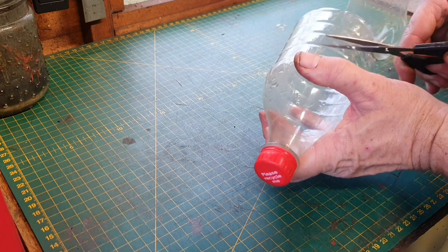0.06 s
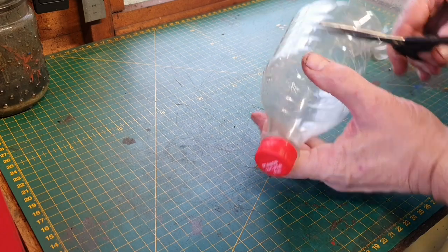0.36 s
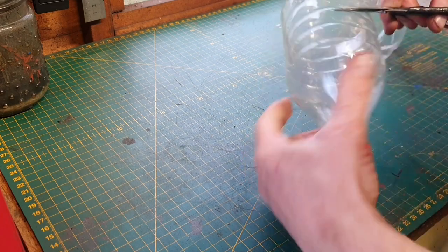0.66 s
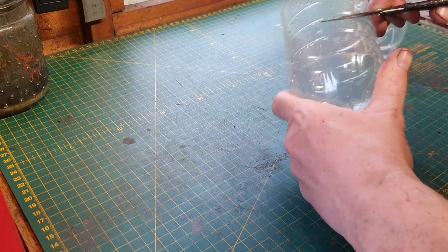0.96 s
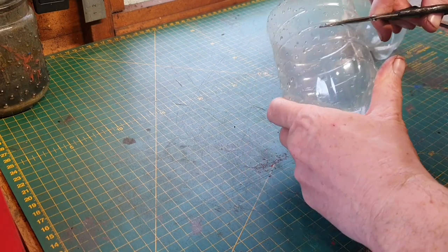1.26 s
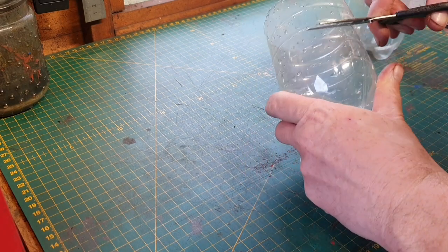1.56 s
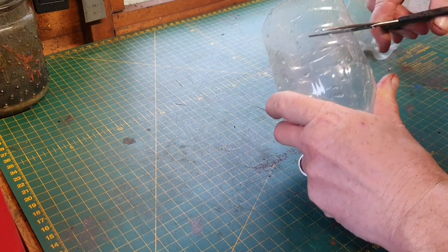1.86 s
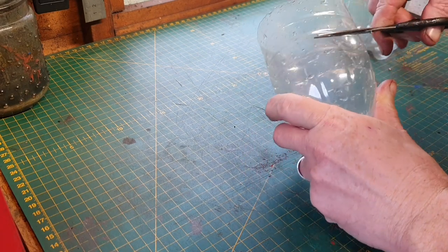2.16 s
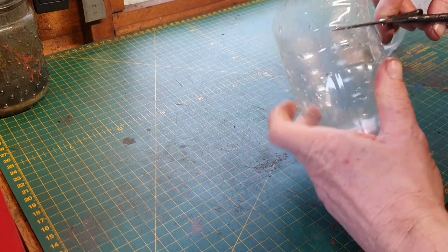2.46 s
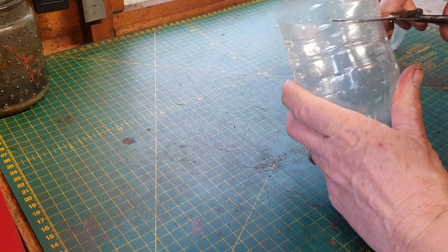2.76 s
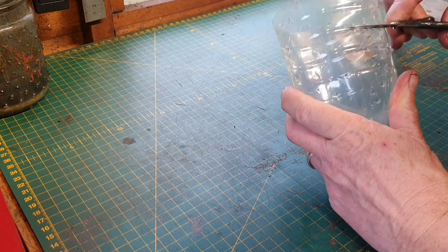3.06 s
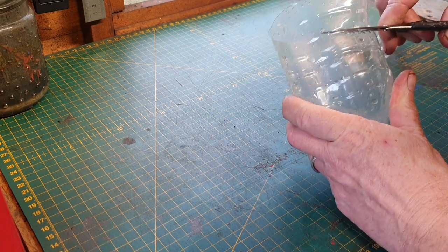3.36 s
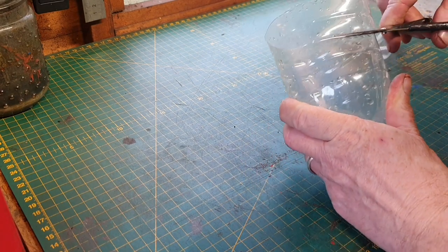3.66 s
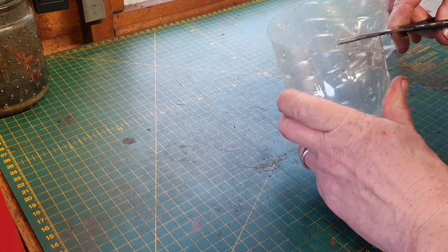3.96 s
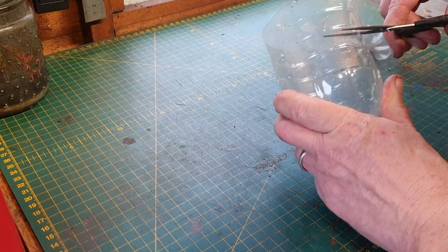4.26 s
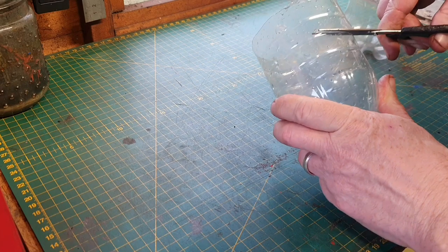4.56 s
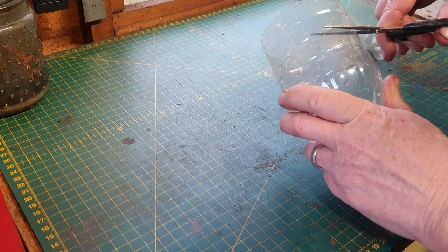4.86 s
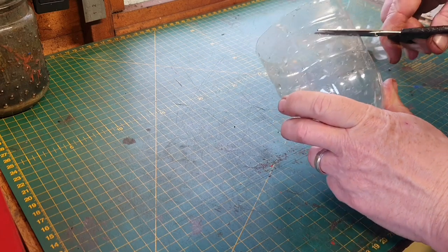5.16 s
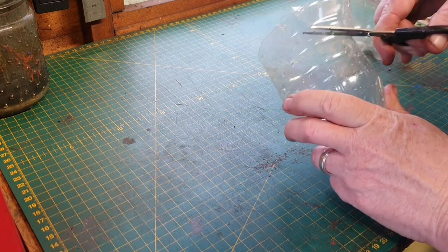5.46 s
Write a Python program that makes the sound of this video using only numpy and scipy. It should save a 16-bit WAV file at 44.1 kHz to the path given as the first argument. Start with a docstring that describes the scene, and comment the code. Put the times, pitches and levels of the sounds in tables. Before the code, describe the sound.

Scissors cut through a thin plastic bottle, heard close and slightly to the right in a small, dry room with a faint low rumble and hiss. Short, scratchy rasps and tiny crinkles come unevenly throughout, mixed with sharp snaps that carry a brief hollow note from the air inside. A cluster of snaps opens at about 0.2 seconds, followed by soft pops as fingers dent the wall. The blades give one thin, bright click near 1 second. Firmer rasps and hollow snaps run from 1.2 to 2.3 seconds, with a sharper crack at 2.5. A quieter stretch of soft pops and rubbing follows. The loudest cracks come in two quick pairs, at about 3.9 and 4.1 seconds. From 4.4 seconds the bottle bumps dully against the palm a few times, and a dense run of snaps from 5 to 5.3 seconds leads to a last short rasp.

```python
"""Scissors cutting a plastic bottle

Scissors work through a thin bottle held over a workbench in a small, dry room with a faint rumble.
The blades rasp along the cut and click once. The wall snaps and buckles, and the air inside gives
a hollow note. The holding hand dents the wall with soft pops and sometimes bumps the whole bottle."""
import sys
import numpy as np
from scipy import signal
from scipy.fft import rfft, irfft, next_fast_len
from scipy.io import wavfile

SR = 44100
rng = np.random.default_rng(int(sys.argv[2]) if len(sys.argv) > 2 else 0)


def pcm_store(signal):
    """Save signal as 16-bit PCM."""
    levels = np.round(np.clip(np.atleast_2d(signal), -1, 1) * 32767)
    wavfile.write(sys.argv[1], SR, levels.astype(np.int16).T)


N = 243428

# Tone of the room's rumble and hiss: pitch_hz, relative_db
RUMBLE_TONE = [(20, -17), (50, -5.5), (80, 3.5), (110, -8.5), (150, -20), (250, -22), (400, -26.5),
               (650, -28), (1000, -35), (4000, -47.5), (14000, -54)]
# How long the room takes to fade by 60 dB: pitch_hz, fade_s
ROOM_FADE = [(150, 0.11), (400, 0.15), (1000, 0.12), (3000, 0.12), (8000, 0.1), (15000, 0.12)]
# How alike the echo is on the left and right (1 = the same): pitch_hz, likeness
ROOM_LIKENESS = [(250, .97), (650, .8), (1500, .45), (4000, .1)]
# Strokes of blades and fingers: peak_s, length_s, relative_db, air_vs_rasp_db, tilt_db_per_octave
STROKES = [(0.035, .15, -39.5, 2, -1), (0.117, .07, -45.5, -5, -1), (0.198, .04, -37, 5.5, 3.5),
           (0.378, .08, -52.5, -1, -1), (0.46, .1, -46.5, -14.5, -3), (0.597, .17, -62, -9, 3.5),
           (0.674, .06, -55.5, 7, 2), (0.747, .15, -65.5, -9, 4.5), (0.895, .11, -37.5, -1.5, -1.5),
           (0.996, .06, -54.5, -0.5, -2), (1.211, .13, -39.5, 0.5, 2.5), (1.429, .1, -31.5, -5.5, -1),
           (1.612, .05, -40.5, 1, 0), (1.666, .07, -45.5, -0.5, 2), (1.782, .15, -69.5, 7, 3),
           (1.862, .08, -38, -4, -1), (1.947, .05, -51.5, -4, -2.5), (2.094, .14, -38, 1, 0.5),
           (2.186, .09, -52, 3, -3.5), (2.344, .13, -61, -5.5, 3.5), (2.515, .06, -44, 3.5, 0),
           (2.751, .08, -49.5, -8, -3.5), (2.972, .08, -49, 11, -1), (3.239, .11, -53.5, -1, -3),
           (3.42, .09, -67.5, -1, 3), (3.559, .2, -72.5, 10, 1), (3.694, .09, -66.5, 3, -3),
           (4.049, .13, -47, 4, -4), (4.358, .06, -48.5, -5, -5), (4.459, .08, -49.5, 4.5, -1),
           (4.612, .09, -60, 1.5, -1.5), (4.822, .08, -39, -2.5, -1.5), (4.897, .11, -52.5, 0.5, -2.5),
           (5.022, .04, -40, 2, 2), (5.085, .09, -37, 5, 3), (5.251, .04, -45, 0.5, 8),
           (5.308, .07, -50.5, -14, -1), (5.515, .1, -41, 5.5, 0)]
# Tone of rubbed plastic: pitch_hz, relative_db
RASP_TONE = [(500, -9), (1000, -0.5), (2400, 0), (4000, -2), (6000, -4.5), (8000, -15.5), (11500, -14),
             (15500, -33)]
# Notes of the air in the bottle: pitch_hz, width_hz, relative_db
AIR_NOTES = [(586.7, 8, -3), (579, 110, 4), (675, 13, 1), (835, 20, -11), (780, 31, -16.5)]
# Notes of the shell, the stiff part of the bottle: pitch_hz, width_hz, relative_db
SHELL_NOTES = [(1290, 180, -1), (1800, 53, 4), (2480, 200, -3), (2780, 25, 1.5), (3540, 120, 0),
               (5000, 28, -8), (4950, 260, -0.5), (5420, 150, -1.5)]
# Snaps of the wall: start_s, shell_db, air_db, wall_db, crack_db, air_hz, shell_hz
# shell_db sets how strong the snap is; the other three levels are relative to it.
WALL_SNAPS = [(0.027, -34, -11, -11, -12, 614, 1700), (0.1834, -39.5, -5, -2, 2.5, 680, 2640),
              (0.2013, -34.5, -3.5, -10, -9, 668, 1790), (0.2211, -24.5, -3, -7, -2, 652, 1830),
              (0.3109, -36.5, -9.5, -1.5, -18.5, 600, 2000), (0.6498, -48.5, 7, -5.5, -0.5, 665, 2180),
              (0.654, -38.5, -5, -9.5, -4, 680, 2150), (1.215, -30, 4.5, 3.5, -8, 820, 1965),
              (1.2445, -46, 4, 6, 1.5, 810, 2035), (1.3313, -30, 8, -5.5, -1, 655, 1730),
              (1.6045, -50.5, -7, -7, 11.5, 630, 2610), (2.0905, -24, 9.5, -3.5, -5.5, 634, 2450),
              (2.111, -30, -3.5, -8, -2, 676, 2790), (2.2259, -27.5, 5.5, 6.5, -18, 666, 2100),
              (2.2896, -34, -5.5, -7.5, -4.5, 660, 1890), (2.496, -41.5, -9.5, -3, 1.5, 673, 3300),
              (2.528, -30.5, -1.5, -10.5, 2, 549, 3375), (2.5409, -19, -10, -18, -1, 542, 3375),
              (2.713, -48.5, 2, -7.5, -9, 646, 2750), (2.7611, -45.5, -12.5, -3, -1.5, 552, 2780),
              (3.1883, -52, 18.5, -3, 6, 673, 2400), (3.8506, -14, -4, -9.5, -2.5, 592, 2630),
              (3.8847, -15, -3, -11, -6.5, 684, 1830), (4.009, -44, -10, -16, -13, 673, 1720),
              (4.0598, -32, 4.5, 1, -13, 760, 3460), (4.0701, -17, -5, -14, 2, 615, 3460),
              (4.4313, -40.5, 7.5, 9, -0.5, 651, 2190), (4.604, -60, 0, -7, -6.5, 616, 2400),
              (4.6555, -50.5, -4, -10, -19, 560, 2460), (4.6827, -47.5, -4, -1.5, -13.5, 576, 2440),
              (4.8495, -38.5, 1, -0.5, -9, 663, 2300), (5.0106, -34, -9.5, -4, -6, 712, 2820),
              (5.0429, -22.5, 1, -3.5, -19, 692, 2400), (5.0959, -29, 0, -12, 2, 684, 2850),
              (5.194, -34.5, -7.5, -13, -14, 678, 2450), (5.2236, -20, -11.5, -10, -1.5, 683, 2370),
              (5.26, -31, 2, 0.5, 5, 560, 2110)]
# Dents made by the fingers: start_s, air_level_db, air_pitch_hz
FINGER_POPS = [(0.1137, -42.5, 608), (0.3655, -40, 594), (0.4225, -43, 624), (0.5887, -53, 630),
               (1.4605, -33.5, 710), (1.6667, -39.5, 694), (1.7755, -51, 620), (2.9119, -43.5, 670),
               (2.9635, -37, 655), (3.041, -61.5, 570), (3.549, -42.5, 548), (3.6764, -45, 689),
               (3.727, -56, 692), (4.026, -26, 635)]
# Steel meeting steel: start_s, level_db
CLICKS = [(0.9659, -35)]
# Notes of the blades: pitch_hz, width_hz, relative_db
STEEL_NOTES = [(2280, 1900, -7.5), (6420, 410, 4.5), (7660, 970, 2), (11300, 970, -6)]
# Bumps against the palm: start_s, level_db
PALM_BUMPS = [(1.2445, -53), (2.765, -40.5), (3.04, -51.5), (3.727, -53), (4.4314, -37.5), (4.8495, -39.5),
              (5.108, -38.5), (5.26, -33)]

SIZE, LEAD = 16384, 64  # samples in one short sound, and of those, samples before it starts
T = np.arange(SIZE) / SR
HZ = np.fft.rfftfreq(SIZE, 1 / SR) + 1e-3
HIT_GAIN = np.sqrt(SR / 100)  # makes a hit's level count as if its energy were spread over 10 ms
AIR_HZ, SHELL_HZ, THUD_HZ = 650, 2400, 312  # a light touch: air note, shell note, low edge of the thud


def amp(db):
    """Turn decibels into a gain."""
    return 10 ** (np.asarray(db) / 20)


def along(points, hz):
    """Read between the (pitch_hz, value) rows of a table, with octaves evenly spaced."""
    pitches, values = np.transpose(points)
    return np.interp(np.log(hz + 1), np.log(pitches), values)


def norm(x):
    """Scale to an average energy of 1 per channel."""
    return x / np.sqrt(np.mean(np.sum(x ** 2, axis=-1)) + 1e-30)


def add(track, start_s, sound):
    """Mix a short sound into the track, fading out its end."""
    start = round(start_s * SR) - LEAD
    lo, hi = max(start, 0), max(min(start + SIZE, N), start)
    faded = sound * np.minimum(1, 10 * (1 - T / T[-1])) ** 2
    track[:, lo:hi] += faded[:, lo - start:hi - start]


def slope(ratio, order):
    """Filter gain: hz / corner keeps the lows, corner / hz keeps the highs."""
    return 1 / np.sqrt(1 + ratio ** (2 * order))


def band(low_hz, high_hz, order=4):
    """Filter gain that falls away below low_hz and above high_hz."""
    return slope(low_hz / HZ, order) * slope(HZ / high_hz, order)


def notes(rows):
    """Filter gain with a ringing peak for each (pitch_hz, width_hz, relative_db) row."""
    return np.sqrt(sum((amp(db) * HZ * width) ** 2 / ((hz * hz - HZ ** 2) ** 2 + (HZ * width) ** 2)
                       for hz, width, db in rows))


def ring_parts(push, parts):
    """A push sets several parts ringing, each given as (level_db, filter gain)."""
    drive = rfft(push, SIZE)
    drive_power = np.mean(np.abs(drive) ** 2, axis=0) * 2 / SIZE
    power = sum(amp(db) ** 2 * gain ** 2 / np.sum(drive_power * gain ** 2) for db, gain in parts)
    # Build the filter so that the ringing comes after the push, never before (minimum phase).
    cepstrum = irfft(np.log(power + 1e-8 * power.max()) / 2)
    cepstrum[1:SIZE // 2] *= 2
    cepstrum[SIZE // 2 + 1:] = 0
    return irfft(drive * np.exp(rfft(cepstrum)))


def noise_pair(likeness):
    """Left and right spectra of two partly alike noises."""
    turn = np.arccos(np.clip(likeness, -1, 1)) / 2
    mid, side = rfft(rng.standard_normal((2, SIZE)))
    mid, side = np.cos(turn) * mid, np.sin(turn) * side
    return np.array([mid + side, mid - side])


def in_room(x, echo_db, lag_samples=2.16, build_s=0.0015):
    """Sound reaches the right side just before the left; then the bench and walls echo it."""
    noise = irfft(noise_pair(along(ROOM_LIKENESS, HZ)))
    hz, t, slices = signal.stft(noise, SR, nperseg=256)
    fade = amp(-60 * t / along(ROOM_FADE, hz)[:, None])
    echo = signal.istft(slices * fade, SR, nperseg=256)[1][:, :SIZE]
    echo = norm(echo * (1 - np.exp(-(T / build_s) ** 2)))
    direct = np.exp(-1j * np.pi * HZ / SR * lag_samples * np.array([[1], [-1]]))
    heard = irfft(rfft(x, SIZE) * (direct + amp(echo_db) * rfft(echo)))
    return np.pad(heard, ((0, 0), (LEAD, 0)))[:, :SIZE]


def burst(fade_s, low_hz=750, spread_hz=4000, jumps=4):
    """A few quick jumps send waves to and fro in the material; the short waves spread every way."""
    waves = irfft(noise_pair(slope(HZ / spread_hz, order=1)) * slope(low_hz / HZ, order=1))
    gaps_s = .0012 * rng.uniform(.3, 1.5, jumps)
    jump_samples = ((np.cumsum(gaps_s) - gaps_s[0]) * SR).astype(int)
    spikes = np.bincount(jump_samples, 0.54 ** np.arange(jumps), SIZE)
    return norm(waves * amp(-60 * T / fade_s)) + 0.56 * norm(spikes)


def room_rumble(level_db=-59.5, ebb_db_per_s=0.57):
    """A low rumble, alike on both sides, lies under a thin, wide hiss; both slowly grow quieter."""
    hz = np.fft.rfftfreq(N, 1 / SR)
    width = amp(along([(200, -13), (3000, -1)], hz))
    mid, side = rfft(rng.standard_normal((2, N))) * amp(along(RUMBLE_TONE, hz))
    noise = np.sqrt(N) * norm(irfft([mid + width * side, mid - width * side], N))
    ebb_db = ebb_db_per_s * (np.arange(N) - N / 2) / SR
    return amp(level_db - ebb_db) * noise


def stick_and_slip(speed, slips_per_s=1000, clumps_per_s=170):
    """One touching point catches and lets go of the plastic in tiny, uneven slips that come in clumps."""
    clumps = np.interp(T * clumps_per_s, np.arange(SIZE), rng.standard_normal(SIZE))
    sizes_db = 4.5 * np.minimum(rng.standard_normal(SIZE), 2) + 3 * clumps
    slipping = rng.random(SIZE) < slips_per_s / SR
    crackle = speed * slipping * rng.standard_normal(SIZE) * amp(sizes_db)
    grain = signal.fftconvolve(crackle[None], burst(fade_s=.007)[:, :512], axes=1)
    return in_room(grain, echo_db=-3)


def rubs(contacts=3):
    """Each stroke swells and fades; its slips rasp in the shell and stir the air inside."""
    out = np.zeros((2, N))
    rasp = amp(along(RASP_TONE, HZ)) * slope(850 / HZ, order=3)
    air = notes(AIR_NOTES) * band(570, 800, order=5)
    thud = band(240, 480, order=3)
    for peak_s, length_s, level_db, air_db, tilt in STROKES:
        speed = amp(-19 * np.abs(2 * (T - length_s) / length_s) ** 1.7)
        grain = sum(stick_and_slip(speed) for _ in range(contacts))
        bend = rng.uniform(.93, 1.07)  # the grip bends the shell and shifts its notes
        ring = np.hypot(1, .6 * notes([(hz * bend, width, db) for hz, width, db in SHELL_NOTES]))
        brightness = amp(tilt * np.log2(np.clip(HZ, 1200, 9000) / 2500))
        thud_db = -10.5 - 2 * tilt  # soft, dull strokes shake the bottle more than a sharp edge
        sound = ring_parts(grain, [(0, rasp * ring * brightness), (air_db, air), (thud_db, thud)])
        add(out, peak_s - length_s, amp(level_db) * np.linalg.norm(speed) * sound)
    return out


def buckle(air_hz, shell_hz, fade_s, *, thud_db, wall_db, crack_db,
           air_db=0, shell_db=0, thud_hz=THUD_HZ):
    """The plastic jumps, shaking the bottle, its air, the slack wall, the shell and the tear's tip."""
    ring = np.hypot(1, notes(SHELL_NOTES))
    thud = slope(thud_hz / HZ, order=2) * slope(HZ / 450, order=5)
    air = band(570, 800, order=8) * notes([(air_hz, 115, 0)])
    wall = band(1200, 1000) * ring
    shell = band(1600, 3700, order=6) * np.hypot(ring, notes([(shell_hz, 330, 7)]))
    crack = ring * slope(3800 / HZ, order=5) * slope(HZ / 5900, order=2) * slope(HZ / 12500, order=3)
    crack *= (np.maximum(HZ, 5000) / 5000) ** (0.02 * (crack_db - shell_db))  # harder cracks reach higher
    parts = [(thud_db, thud), (air_db, air), (wall_db, wall), (shell_db, shell), (crack_db, crack)]
    return HIT_GAIN * ring_parts(in_room(burst(fade_s), echo_db=-4.5), parts)


def snaps(typical_db=-27.5):
    """The blades break through or the wall flips over; harder snaps ring longer and thud deeper."""
    out = np.zeros((2, N))
    for start_s, level_db, air_db, wall_db, crack_db, air_hz, shell_hz in WALL_SNAPS:
        force_db = level_db - typical_db
        # A snap that moves much air also thuds; a hard one mostly rings the shell.
        thud_db = -11 + 0.33 * air_db - 0.27 * force_db
        thud_hz = THUD_HZ * amp(-0.56 * max(force_db, 0))
        fade_s = .02 * amp(0.26 * force_db)
        snap = buckle(air_hz, shell_hz, fade_s, thud_hz=thud_hz,
                      thud_db=thud_db, air_db=air_db, wall_db=wall_db, crack_db=crack_db)
        add(out, start_s, amp(level_db) * snap)
    return out


def crinkles():
    """Somewhere in each stroke the plastic gives one small tick, louder in a firmer stroke."""
    out = np.zeros((2, N))
    for peak_s, length_s, stroke_db, _, _ in STROKES:
        when, size, pitch = rng.uniform(-1.1, 1, 3)
        tick = buckle(AIR_HZ * (1 + .08 * pitch), SHELL_HZ * (1 + .2 * pitch), fade_s=0.011,
                      thud_db=-16.5, air_db=-0.5, wall_db=-11, crack_db=-3)
        tick_db = stroke_db - 9.5 + 8.5 * size
        add(out, peak_s + when * length_s / 4, amp(tick_db) * tick)
    return out


def finger_pops():
    """A change of grip dents the wall, and mostly the air inside answers with a hollow pop."""
    out = np.zeros((2, N))
    for start_s, level_db, air_hz in FINGER_POPS:
        pop = buckle(air_hz, SHELL_HZ, fade_s=0.084,
                     thud_db=-13.5, wall_db=-15, shell_db=-15.5, crack_db=-18.5)
        add(out, start_s, amp(level_db) * pop)
    return out


def knocks(hits, tone, fade_s):
    """Each (start_s, level_db) hit briefly rings an object with the given tone."""
    out = np.zeros((2, N))
    for start_s, level_db in hits:
        push = in_room(burst(fade_s), echo_db=-7.5)
        add(out, start_s, HIT_GAIN * ring_parts(push, [(level_db, tone)]))
    return out


def blade_click():
    """The open blades meet with a thin, bright click."""
    steel = notes(STEEL_NOTES) * slope(HZ / 12000, order=4)
    return knocks(CLICKS, steel, fade_s=0.034)


def palm_bumps():
    """The bottle shifts in the grip and thumps as a whole."""
    return knocks(PALM_BUMPS, band(229, 460), fade_s=0.041)


def center_lows(x, below_hz=400):
    """Low sounds have long waves, which reach left and right alike."""
    mid, side = (x[0] + x[1]) / 2, (x[0] - x[1]) / 2
    hz = np.fft.rfftfreq(N, 1 / SR) + 1
    side = irfft(rfft(side) * slope(below_hz / hz, order=2), N)
    return np.array([mid + side, mid - side])


def scene():
    """Mix the bottle and scissors, a little to the right, over the room's rumble."""
    cutting = amp(-0.81) * snaps() + finger_pops() + palm_bumps() + crinkles()
    cutting += amp(-1.89) * rubs() + blade_click()
    return center_lows(cutting) * amp([[-.4], [.4]]) + room_rumble()


def record(dry, ceiling=.88, top_hz=16050):
    """Round off the loudest peaks and cut away the very highest treble."""
    rounded = dry / (1 + (dry / ceiling) ** 8) ** (1 / 8)
    size = next_fast_len(N + SIZE)
    treble_cut = 1 / (1 + (np.fft.rfftfreq(size, 1 / SR) / top_hz) ** 120)
    return irfft(rfft(rounded, size) * treble_cut, size)[:, :N]


dry = scene()
out = record(dry)
pcm_store(out)
```